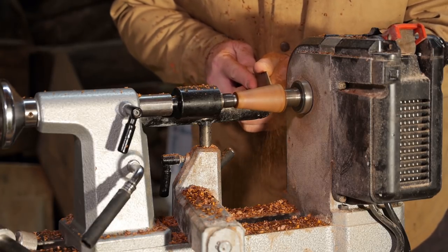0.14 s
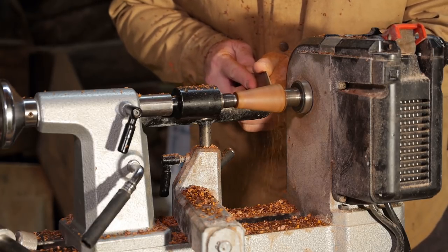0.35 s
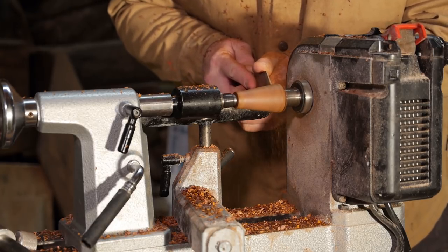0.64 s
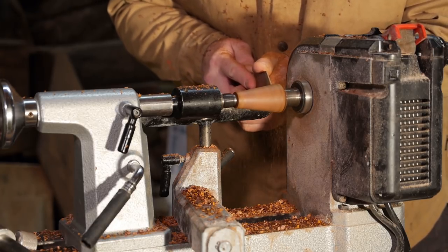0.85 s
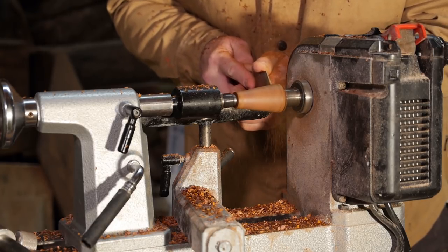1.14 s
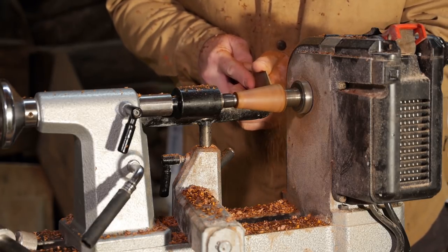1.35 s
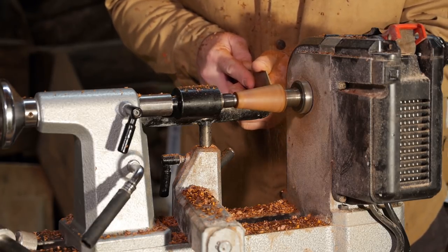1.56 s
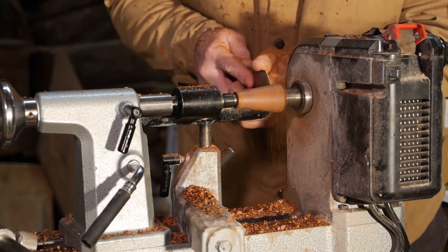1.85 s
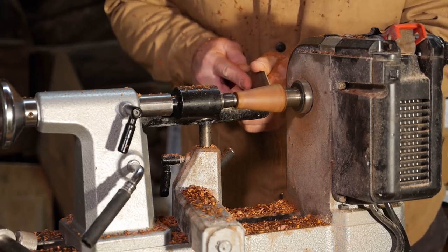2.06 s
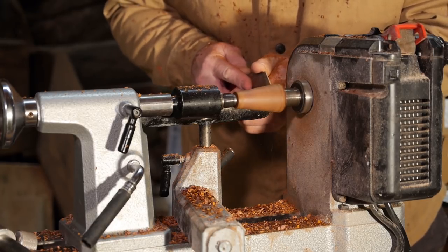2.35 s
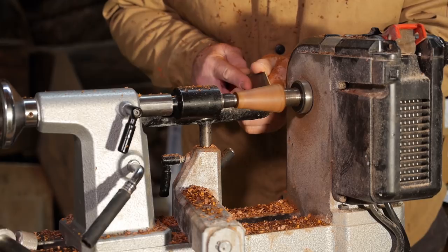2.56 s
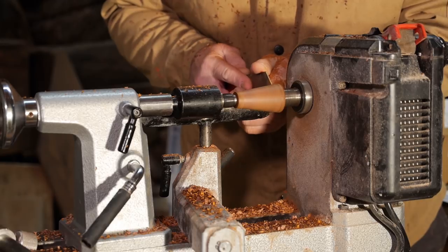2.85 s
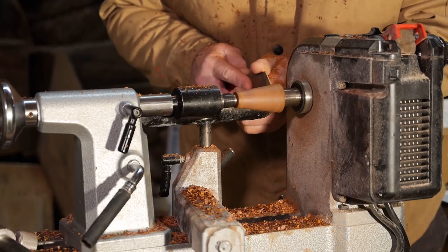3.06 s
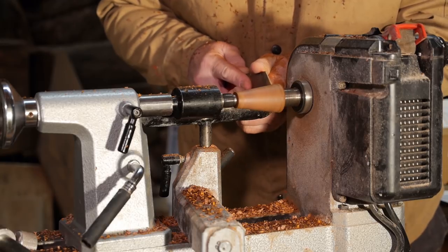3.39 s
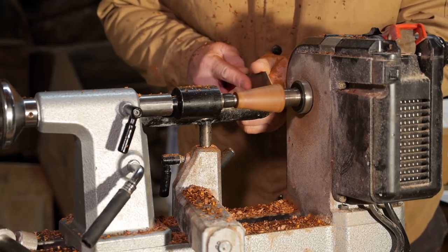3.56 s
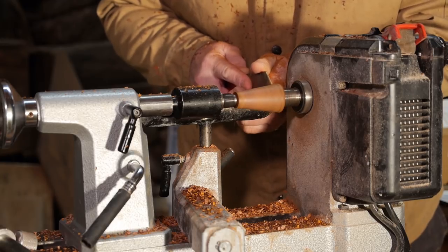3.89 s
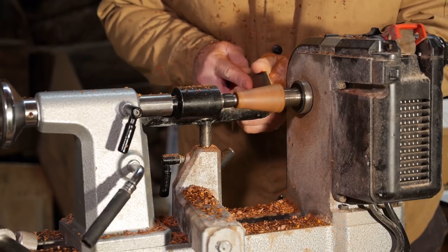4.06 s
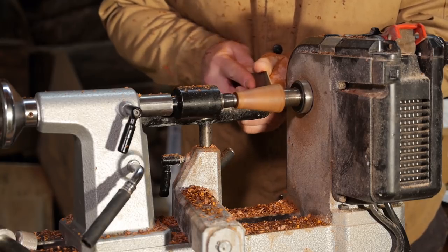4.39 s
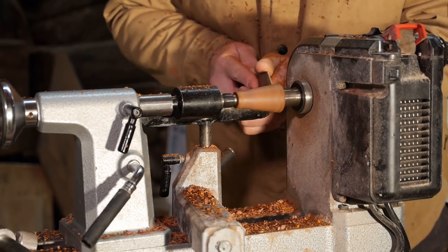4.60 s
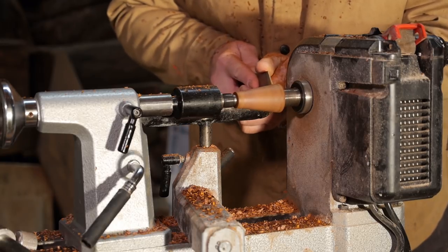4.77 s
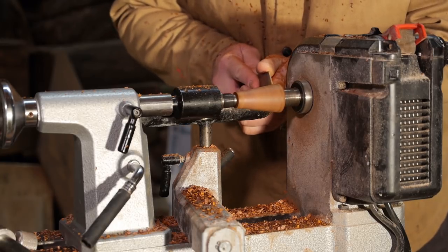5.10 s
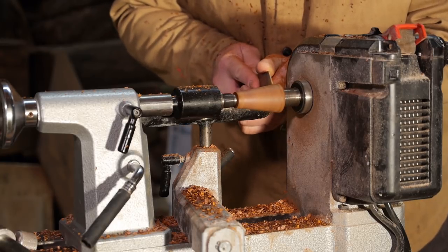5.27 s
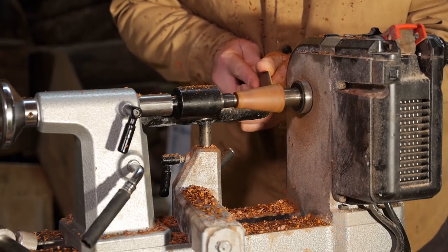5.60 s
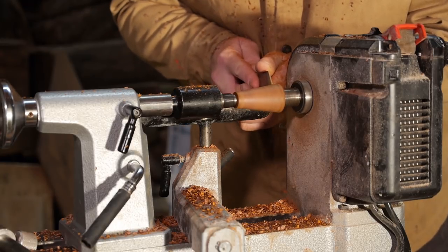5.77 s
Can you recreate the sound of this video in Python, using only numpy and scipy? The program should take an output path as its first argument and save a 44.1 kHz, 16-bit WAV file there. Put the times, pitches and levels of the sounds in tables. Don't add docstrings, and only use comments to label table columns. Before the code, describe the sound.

A small wood lathe is heard close up, in mono, in a workshop with a short reverberation. A quiet, slightly lumpy motor whirr runs throughout. From 0 to about 2 seconds a gouge cuts steadily: a dense, raspy buzz with a low droning tone near 300 hertz, pulsing about 33 times a second, with woody mid resonances and thin shaving hiss. Around 1.9 to 2.1 seconds the tool lifts amid a few sharp ticks, the drone falls away and the spindle speeds up slightly. Until about 4 seconds, short dry bites rattle in irregular bursts, once per turn, with stronger snaps near 2.4, 2.7, 3.0, 3.6 and 3.95 seconds and brief quieter gaps between, the room answering softly. From about 4.2 seconds the bites merge into a second continuous pass: scratchier, brighter and more rattling than the first, less tonal, slowing slightly and swelling until it stops abruptly just before 6 seconds.

```python
import sys
import numpy as np
from scipy import signal
from scipy.fft import rfft, irfft, next_fast_len
from scipy.io import wavfile
from scipy.ndimage import map_coordinates

SR = 44100
rng = np.random.default_rng(int(sys.argv[2]) if len(sys.argv) > 2 else 0)


def transcribe(u):
    v = np.clip(np.atleast_2d(u).T, -1, 1)
    q = np.round(v * 32767).astype(np.int16)
    wavfile.write(sys.argv[1], SR, q)


def volts_from_db(level):
    exponent = np.asarray(level, float) / 20
    return 10 ** exponent


N = 261954
SECONDS = np.arange(N) / SR
SIZE = next_fast_len(N + SR // 2)
HZ = np.fft.rfftfreq(SIZE, 1 / SR)

# frequency in Hz, level in dB.
MOTOR_COLOUR = [(15, -46), (25, -16), (76, -9), (175, -2), (344, -14), (489, -24), (531, -26.5), (887, -3),
                (3720, -13), (16000, -36)]
# frequency in Hz, time to fall 60 dB in seconds.
ROOM_DECAY = [(200, 0.38), (2000, 0.36), (10000, 0.16)]
RANGE_LIMITS = [0, 490, 1500, 4700, 30000]
# time in seconds, speed in turns per second.
SPINDLE = [(0.0, 33.27), (0.3, 33.29), (0.6, 33.34), (0.9, 33.36), (1.05, 33.31), (1.2, 33.2), (1.4, 33.14),
           (1.7, 33.21), (1.9, 33.26), (2.0, 33.29), (2.15, 35.2), (2.4, 35.09), (2.8, 35.08), (3.2, 35.19),
           (3.6, 34.86), (4.0, 35.08), (4.3, 34.98), (4.6, 34.95), (4.8, 34.8), (5.0, 34.97), (5.2, 35.13),
           (5.35, 34.78), (5.5, 34.49), (5.7, 34.28), (5.94, 34.2)]
# time in seconds, then bed thrum, bite, scrape and shaving hiss in dB.
CUT_LEVELS = [(0.0, -24, -28, -27.5, -32), (0.33, -25.5, -26, -29, -31.5), (0.61, -23.5, -24.5, -26, -32),
              (1.01, -23, -29, -27, -33), (1.36, -24, -30.5, -28.5, -33.5), (1.65, -22, -30, -28.5, -32),
              (1.79, -22, -30, -29, -33), (1.88, -22, -31, -27, -33.5), (2.02, -26.5, -40, -32, -36),
              (2.08, -30, -46, -35, -42), (2.25, -38, -38, -36, -40), (2.36, -33.5, -42, -38, -46),
              (2.58, -42.5, -51, -40, -55), (2.7, -34.5, -38, -24, -41), (2.79, -50, -56, -46, -61),
              (3.03, -39, -40, -41, -50), (3.16, -35.5, -36, -28, -41), (3.21, -43, -42, -33, -40),
              (3.46, -27, -36.5, -28.5, -34.5), (3.64, -38, -47, -38, -48), (3.82, -30, -48, -31, -44),
              (3.94, -34.5, -45, -32.5, -42), (4.23, -33, -40, -30.5, -38.5),
              (4.38, -31.5, -31.5, -26, -38.5), (4.52, -27.5, -32, -26, -35),
              (4.81, -29.5, -31.5, -25, -35), (5.26, -30, -31.5, -26, -32.5),
              (5.39, -28.5, -28.5, -22.5, -32.5), (5.54, -27, -28.5, -23, -33),
              (5.94, -26.5, -27, -21, -32)]
# time in seconds, angle in turns, swell in dB, knock on the tool in dB,
# tick in dB, thump in the bed in dB, memory of the ridges from 0 to 1.
HIGH_SPOT = [(0, 0.27, 7.5, -2, -11, -14, 0.97), (.6, 0.24, 0, -2.5, -8, -18, 0.98),
             (1.1, 0.28, 8.5, -1, -12, -17, 1), (1.5, .25, 8, 0.5, -5, -24, 0.77),
             (1.85, .25, 7.5, -2.5, -3, -17, .9), (2.1, 0.21, -1, -14, -5, -16, 0.67),
             (2.35, .18, 6, -7, -8, -17, 0.53), (2.45, 0.18, 5.5, -10, -14, -19, 0.44),
             (4.2, 0.18, 1.5, -22, -10, -8, 0.73), (4.45, 0.011, -7, -7, -2, -11, 0.93),
             (4.7, -0.015, 2.5, -4.5, -9, -10, 0.83), (4.95, 0.015, 6, -11.5, -5, -5, 0.9),
             (5.2, 0.03, 2, -3, -2, -9.5, 0.82), (5.45, -0.075, 2, -8.5, -8, -4, 0.96),
             (5.94, -0.077, -1, -12, -8, -1.5, 1)]
# start in seconds, peak in dB, knock in dB, hiss in dB,
# decay time in ms, rise time in ms.
BITE_EVENTS = [(1.931, -12, -19, -13, 4.9, 1.2), (1.961, -13, -31, -9, 3.7, 0.84),
               (1.9908, -11, -13, -10, 4.8, 0.99), (2.0194, -16, -15, -9, 6.9, 1.1),
               (2.0503, -18.5, -17, -15, 5.5, 1.2), (2.0787, -19, -18, -18, 5.5, 1.2),
               (2.107, -21, -18, -25, 7, 1), (2.2505, -24.5, -14, -19, 5.5, 1.2),
               (2.279, -23.5, -9, -17, 6, 1.1), (2.3346, -22.5, -8, -6, 4.4, 1.2),
               (2.362, -12, -8.5, -15, 4.4, 1), (2.366, -5, -5, -22, 4.3, 0.95),
               (2.396, -5, -15.5, -14.5, 3.8, 1), (2.5098, -25, -7, -10, 5.5, 1.2),
               (2.5376, -19.5, -8, -9, 6.2, 1.2), (2.5658, -14, -7, -13, 5.1, 1),
               (2.5944, -21, -17, -10, 5.5, 0.99), (2.6194, -21, -4, -11, 6.2, 1.2),
               (2.6452, -15, -12, -19, 6.3, 1.2), (2.675, -13.5, -6.5, -18, 5.1, 1.1),
               (2.7025, -10, -2, -14, 5.8, 1.1), (2.7324, -4, -6, -18, 3.4, 1.6),
               (2.9024, -33.5, -5, -9, 5.5, 1.2), (2.931, -30, -10, -13, 4.9, 1.2),
               (2.9614, -23, -22, -15, 5.5, 1.2), (2.9862, -18, -11, -13, 5, 1.1),
               (2.9931, -10.5, -12, -17, 5.9, 1.1), (3.013, -5, -10, -14, 6.4, 0.84),
               (3.027, -10.5, -10, -13, 4.2, 1.1), (3.0494, -15, -11, -14, 7, 1.1),
               (3.0756, -9, -9, -13.5, 5.5, 1.4), (3.1077, -8, -11, -14, 6, 1.1),
               (3.1626, -16, -12, -12, 5.5, 1.1), (3.1892, -17.5, -6, -9, 6.4, 1.4),
               (3.2194, -19.5, -14, -8, 4.6, 1.2), (3.245, -23, 0, -8, 5.5, 1.2),
               (3.27, -17, -15, -10, 5.5, 0.98), (3.3009, -12, -11, -10, 7.9, 1.2),
               (3.329, -16, -12, -13, 7, 1.4), (3.3578, -11, -15, -14, 4.5, 1.4),
               (3.3884, -21, -14.5, -3, 6.3, 1.2), (3.4138, -15.5, -14, -5, 6.9, 1.4),
               (3.4428, -17, -12, -9, 4.5, 1), (3.4724, -17.5, -15, -14.5, 4.8, 1.2),
               (3.5033, -17, -16, -17, 5.5, 1.2), (3.5314, -17.5, -19, -12, 5.5, 1.1),
               (3.5598, -12, -6.5, -2.5, 6.1, 1.3), (3.5886, -5.5, -7, -17, 4.6, 1.1),
               (3.6212, -2, -25, -17.5, 4.2, 1.5), (3.7325, -17.5, -11, -8, 5.5, 1),
               (3.7596, -19, -9, -12, 5.5, 1.2), (3.7878, -14, -6, -16, 6.7, 1.2),
               (3.817, -13, -3, -10, 5.1, 1.3), (3.845, -11.5, -2, -9.5, 7.7, 1.2),
               (3.8745, -17, 1, -8, 7.4, 1.3), (3.903, -12.5, -3, -10.5, 6, 1.5),
               (3.9304, -5.5, -5, -16.5, 5.2, 1), (3.9627, -5, -11.5, -15, 4.9, 1.6),
               (4.1843, -20.5, -5, -3, 5.5, 1.1), (4.2138, -16.5, -9, -10, 6.2, 1.2),
               (4.2477, -13.5, -11, -19, 4.3, 1.2), (4.2485, -12, -3, -14, 4.3, 1.2),
               (4.2697, -6.5, -17, -14, 6.2, 1.4), (4.305, -12.5, -13, -13, 6.2, 1.2),
               (4.329, -15, -11, -13, 5.5, 1.2), (4.364, -14, -22, -11.5, 5.5, 1.1)]
# shaft order, level in dB.
CHATTER_ORDERS = [(1, -49), (2, -70), (3, -58), (4, -31), (5, -29), (6, -18), (7, -23), (8, -26), (9, 0.5),
                  (10, -18), (11, -12), (12, -17), (13, -10), (14, -20), (15, -20)]
# frequency in Hz, width in Hz, level in dB.
FIRST_MODES = [(717, 160, 4), (934, 75, 1.5), (1155, 180, 3.5), (1666, 34, 3), (1880, 79, -1),
               (2373, 74, -1), (2880, 160, -3), (3307, 25, 1), (3560, 81, -7), (3880, 72, -19),
               (5220, 81, -17.5), (5610, 56, -57), (6550, 45, -24), (6610, 190, -15.5), (6820, 65, -10.5),
               (8240, 210, -17)]
SECOND_MODES = [(666, 110, 0.5), (900, 67, 4), (1230, 88, -3), (1945, 180, -0.5), (2947, 52, 1),
                (3240, 51, -10), (4840, 110, -26), (5200, 210, -11), (6520, 170, -10), (6850, 100, -5.5),
                (7400, 95, -6), (8000, 220, -24), (8700, 34, -27)]
STRUCK_MODES = [(402, 89, 4.5), (674, 160, 6.5), (1124, 184, 5), (1425, 25, -6), (1634, 61, 0),
                (1902, 56, -0.5), (2530, 32, -9), (2882, 36, 0), (3230, 43, -3.5), (3530, 140, -11),
                (3800, 91, -14.5), (5130, 62, -16.5), (6510, 170, -13.5), (6780, 150, -11),
                (9700, 270, -27.5), (11300, 540, -22.5)]
# frequency in Hz, spectral level in dB.
FIRST_COLOUR = [(35, -70), (70, -46), (200, -21), (300, -10.5), (450, -13), (560, -21), (2000, -11),
                (4300, -27), (7000, -32), (9800, -38.5), (11600, -31), (12900, -39), (14600, -33),
                (16000, -54)]
SECOND_COLOUR = [(35, -62), (70, -35), (200, -13.5), (310, -0.5), (450, -2), (550, -15), (1000, -14),
                 (2900, -12), (5800, -24), (7000, -19.5), (9600, -26.5), (13300, -21), (15200, -29.5),
                 (16000, -49)]
STRUCK_COLOUR = [(88, -68), (150, -43), (291, 1.5), (662, -3), (821, 2.5), (1120, -5), (2920, -8),
                 (3160, -12.5), (16000, -30.5)]


def rms(x):
    return np.sqrt(np.mean(x ** 2) + 1e-20)


def along(points, hz):
    f, v = np.transpose(points)
    return np.interp(np.log(hz + 1), np.log(f + 1), v)


def curves(rows):
    s, *columns = np.transpose(rows)
    return np.array([np.interp(SECONDS, s, column) for column in columns])


def wobble(rate):
    knots = rng.standard_normal(int(N * rate / SR) + 4)
    return map_coordinates(knots, [np.arange(N) * rate / SR])


def filtered(x, response):
    return irfft(rfft(x, SIZE) * response, SIZE)[..., :N]


def motor():
    whirr = filtered(rng.standard_normal(N), volts_from_db(along(MOTOR_COLOUR, HZ)))
    return volts_from_db(-45 + 0.8 * wobble(6)) * whirr / rms(whirr)


def shop(x):
    hz, t, z = signal.stft(rng.standard_normal(SR // 2), SR, nperseg=256)
    decay = volts_from_db(-60 * t / along(ROOM_DECAY, hz)[:, None])
    tail = signal.istft(z * decay, SR, nperseg=256)[1]
    delayed = np.pad(x, (300, 0))
    return signal.fftconvolve(delayed, tail / np.linalg.norm(tail))[:N]


def body(broad, modes, broad_db, mode_db):
    power = volts_from_db(along(broad, HZ) + broad_db) ** 2
    for centre, width, db in modes:
        power = power + volts_from_db(db + mode_db) ** 2 / (1 + (2 * (HZ - centre) / width) ** 2) ** 2
    cepstrum = irfft(np.log(power + 1e-12) / 2, SIZE)
    cepstrum[1:SIZE // 2] *= 2
    cepstrum[SIZE // 2 + 1:] = 0
    return np.exp(rfft(cepstrum))


def layers(drive, gains, response):
    lowpass = [1 / (1 + (HZ / (hz + 1)) ** 8) for hz in RANGE_LIMITS]
    out = np.zeros(N)
    for low, high, gain in zip(lowpass, lowpass[1:], gains):
        part = filtered(drive, np.sqrt(np.abs(high - low)))
        out += filtered(gain * part, response) / rms(filtered(part, response))
    return out


def bites():
    gains = np.zeros((4, N + SR))
    t_ms = 1000 * (np.arange(SR // 10) / SR)
    for s, db, knock_db, hiss_db, decay_ms, rise_ms in BITE_EVENTS:
        rise = 1 - np.exp(-(t_ms / max(rise_ms, 0.2)) ** 2)
        burst = np.exp(-t_ms / max(decay_ms, 1)) * rise
        levels = db + np.array([knock_db - 6, knock_db - 7.5, -6, hiss_db - 2.5])
        start = round(s * SR) - 30
        gains[:, start:start + len(t_ms)] += volts_from_db(levels)[:, None] * burst / burst.max()
    tearing = rng.standard_normal(N) * volts_from_db(1.67 * wobble(500))
    return layers(tearing, gains[:, :N], body(STRUCK_COLOUR, STRUCK_MODES, broad_db=0, mode_db=2.9))


def ridges(turns, life):
    size = 1280
    keep = np.exp(-1 / life)
    fresh = rng.standard_normal((int(turns[-1]) + 102, size))
    surface = signal.lfilter([np.sqrt(1 - keep ** 2)], [1, -keep], fresh, axis=0)
    surface = surface[100:]
    return map_coordinates(surface.ravel(), [turns * size])


def after(turns, angle, length):
    lag = (turns - angle) % 1
    return np.exp(-lag / length) * (1 - np.exp(-lag / 0.01))


def blow(turns, angle):
    away = ((turns - angle + 0.5) % 1 - 0.5) * 1300
    return np.sinc(0.8 * away) * np.exp(-(away / 8) ** 2)


def chatter(turns):
    out = np.zeros(N)
    for order, db in CHATTER_ORDERS:
        tone = np.sin(2 * np.pi * (order * turns + rng.random()))
        out += volts_from_db(db + 0.38 * wobble(2.34)) * tone
    return out / rms(out)


def cutting(turns):
    angle, swell_db, knock_db, tick_db, thump_db, memory = curves(HIGH_SPOT)
    memory = np.clip(memory, 0, 1)
    level = volts_from_db(curves(CUT_LEVELS))

    coarse = 1 / (1 + (HZ / 3500) ** 2)
    repeated = filtered(ridges(turns, life=29.3), np.sqrt(coarse))
    kept = repeated + filtered(rng.standard_normal(N), np.sqrt(1 - coarse))
    tearing = rng.standard_normal(N) * volts_from_db(1.9 * wobble(300))
    drive = np.sqrt(memory) * kept + np.sqrt(1 - memory) * tearing / rms(tearing)

    swell = after(turns, angle, 0.44) + 0.8 * after(turns, angle + 0.74, 0.069)
    swell_share = np.array([[0.3], [1.2], [0.7], [0.3]])
    offset_db = np.array([[-0.1], [-4], [-3], [-1.5]])
    gains = level * volts_from_db(swell_db * swell * swell_share + offset_db + 0.36 * wobble(15))
    tick = volts_from_db(tick_db + 12) * after(turns, angle, 0.049) * volts_from_db(2.1 * wobble(30))
    gains[2:] *= 1 + tick * np.array([[0.4], [0.9]])

    knocks = blow(turns, angle + 0.01) - 0.47 * blow(turns, angle + 0.61)
    knocks = knocks * volts_from_db(0.88 * wobble(30))
    knock_gains = level * volts_from_db([thump_db, knock_db, knock_db - 4, tick_db - 3])

    first = 1 / (1 + np.exp((SECONDS - 2.14) / 0.047))
    gains[0] *= 1 - 0.71 * first
    out = first * level[0] * volts_from_db(-0.5) * chatter(turns)
    first_body = body(FIRST_COLOUR, FIRST_MODES, broad_db=0.9, mode_db=-5.5)
    second_body = body(SECOND_COLOUR, SECOND_MODES, broad_db=-1.0, mode_db=-7.5)
    for share, response in [(first, first_body), (1 - first, second_body)]:
        out += layers(drive, gains * share, response)
        out += layers(knocks, knock_gains * share, response)
    return out


def scene():
    turns = np.cumsum(curves(SPINDLE)[0]) / SR
    cut = cutting(turns)
    bite = bites()
    room = volts_from_db(-9.5) * shop(bite) + volts_from_db(-10) * shop(cut)
    return (motor() + room + bite + cut)[None]


def roll_off(x):
    return signal.sosfilt(signal.butter(12, 16720, fs=SR, output="sos"), x)


def record(dry):
    mix = filtered(dry, HZ < 16600)
    return roll_off(mix)


dry = scene()
out = record(dry)
transcribe(out)
```